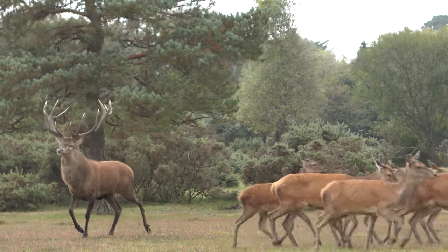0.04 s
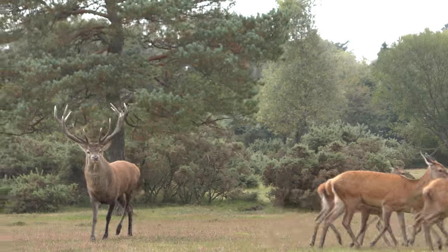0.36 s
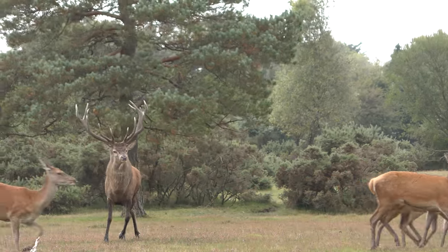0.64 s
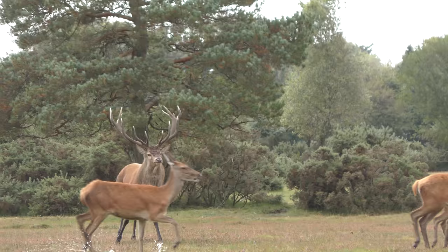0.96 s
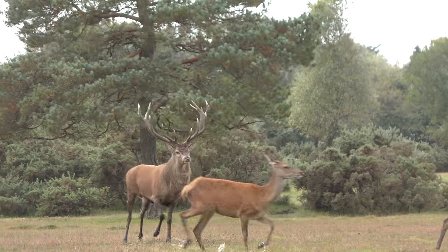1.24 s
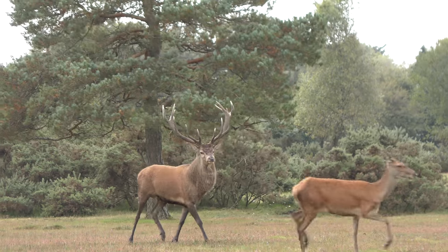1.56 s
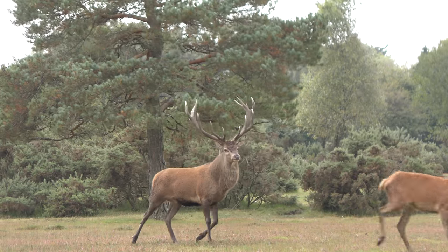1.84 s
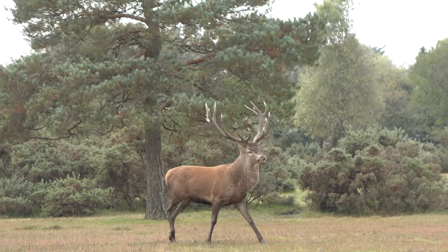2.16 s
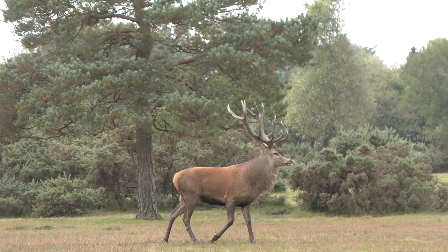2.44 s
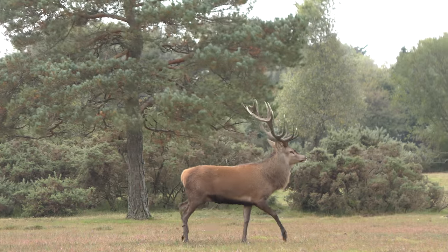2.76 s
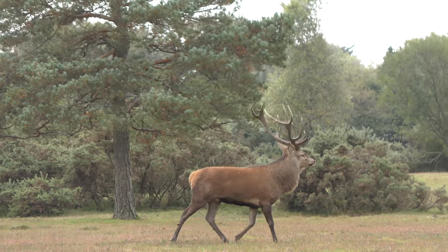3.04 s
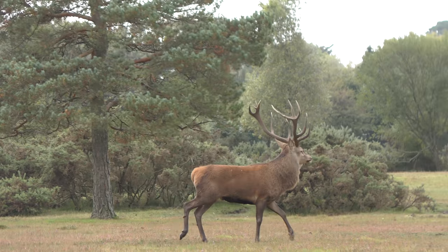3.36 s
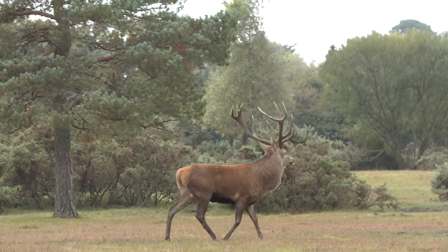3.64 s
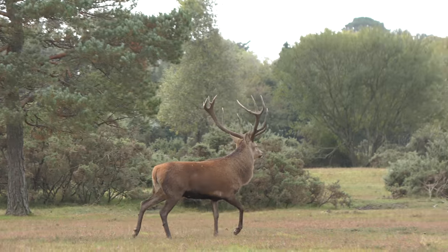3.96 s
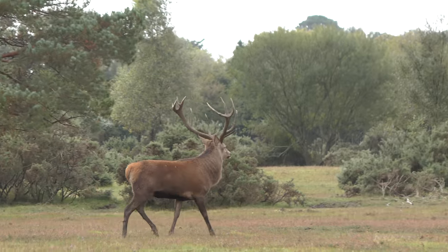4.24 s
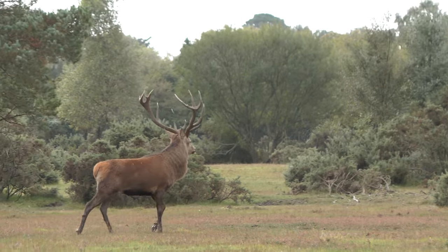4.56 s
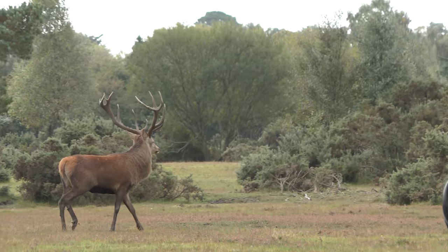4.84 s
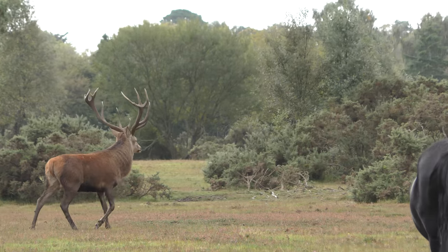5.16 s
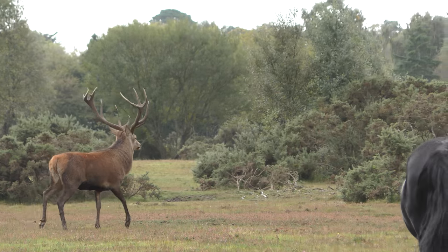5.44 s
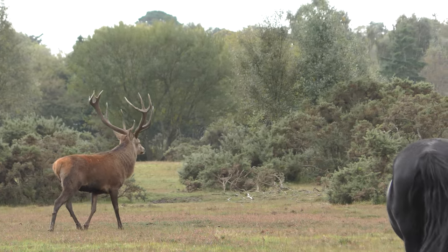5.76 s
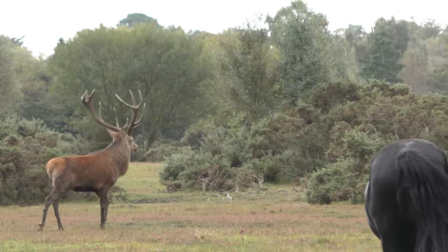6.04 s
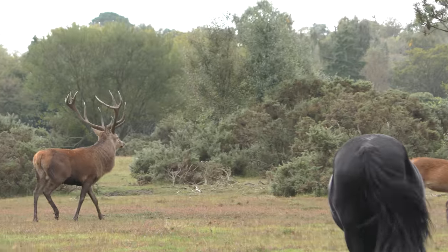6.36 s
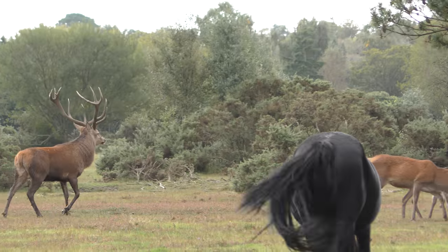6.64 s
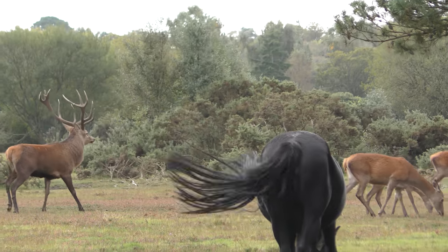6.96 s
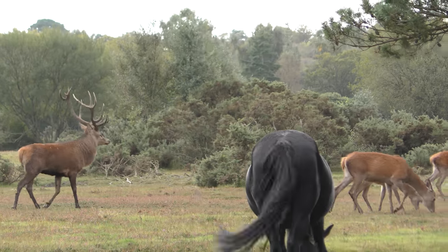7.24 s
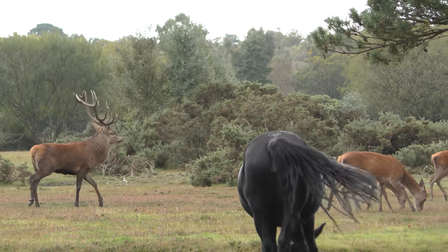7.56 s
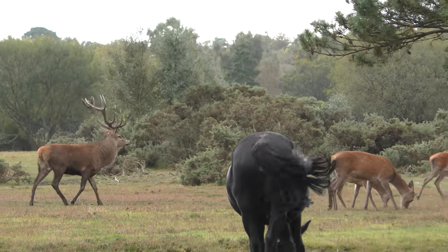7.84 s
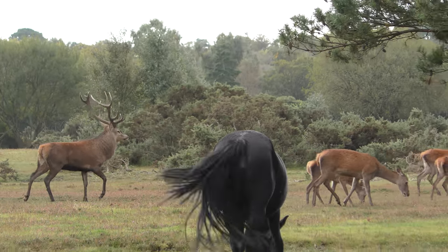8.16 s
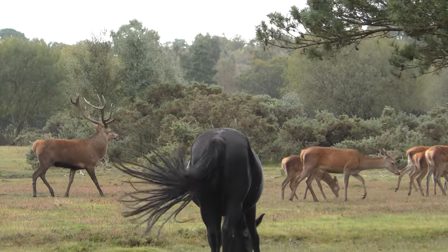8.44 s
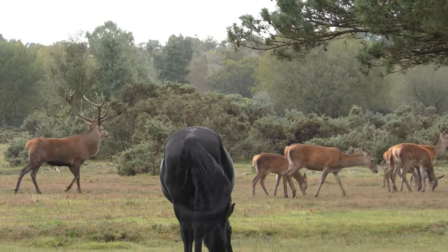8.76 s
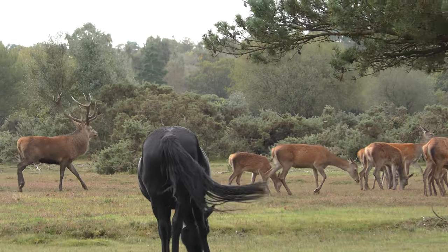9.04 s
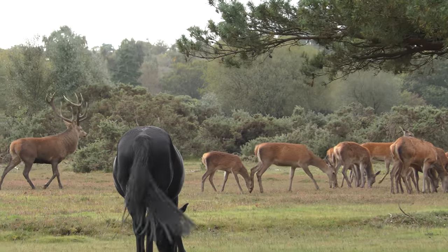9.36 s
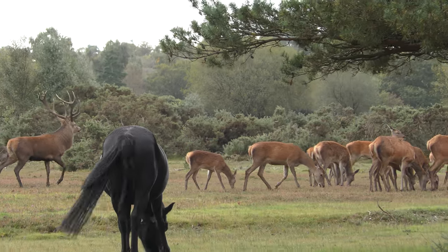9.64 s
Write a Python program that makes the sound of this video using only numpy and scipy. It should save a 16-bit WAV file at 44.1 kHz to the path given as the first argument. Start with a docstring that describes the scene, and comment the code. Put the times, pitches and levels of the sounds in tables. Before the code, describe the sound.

Steady breeze hissing over an open heath, with gusts rumbling and thumping on the microphone and a few faint twig snaps later.

```python
"""An open heath with deer and a grazing pony. Far trees give a steady hush of air; closer in, the breeze
hisses through gorse and pines. Gusts buffet the microphone, hard at first and then lightly, and single
eddies thump on it as quick swings of pressure. A distant bird gives one pip, and in the second half
come a few faint dry snaps, like twigs breaking: a burst of tearing fibres that rings the wood."""
import sys
import numpy as np
from scipy import signal
from scipy.fft import rfft, irfft
from scipy.io import wavfile
from scipy.ndimage import uniform_filter1d

SR = 44100
rng = np.random.default_rng(int(sys.argv[2]) if len(sys.argv) > 2 else 0)


def pcm_store(signal):
    """Save signal as 16-bit PCM."""
    levels = np.round(np.clip(np.atleast_2d(signal), -1, 1) * 32767)
    wavfile.write(sys.argv[1], SR, levels.astype(np.int16).T)


N = 436590

# breeze in the far trees and near foliage, before trim: time_s, hush_db, hiss_db
BREEZE_LEVELS = [(0.0, -53, -49.5), (3.01, -54, -52.5), (3.88, -53, -51.5), (4.44, -54, -53),
                 (5.9, -54, -54), (6.78, -55, -54), (9.9, -54, -51.5)]
# spectra of the far hush and the near hiss: frequency_hz, density_db
HUSH_SPECTRUM = [(30, -34), (60, -11), (120, -1.5), (200, 2), (380, 0.5), (490, 2), (590, -6), (710, -1),
                 (820, -4), (1050, 2.5), (1350, 2), (1700, -0.5), (2400, -1.5), (4500, -22.5)]
FOLIAGE_SPECTRUM = [(1200, -13.5), (2200, -4), (3000, 2.5), (4000, 3.5), (5000, 3), (6300, 1), (7500, -3),
                    (9000, -5), (10500, -9.5), (12500, -17), (15800, -38.5)]
# stereo width of the open air: frequency_hz, side_minus_mid_db
OPEN_AIR_WIDTH = [(60, -11), (200, -33), (700, -21.5), (1290, -21), (2380, -18), (4400, -11), (8120, -3),
                  (15000, -0.3)]
# draught on the microphone, under the gusts: time_s, level_db
MIC_DRAUGHT = [(0, -66), (1.0, -56), (1.3, -48), (1.6, -47.5), (2.1, -53.5), (2.45, -50.5), (2.75, -58.5),
               (3.85, -53.5), (4.15, -63), (6.0, -73.5), (7.1, -68), (8.2, -61), (9.0, -68.5), (9.9, -77)]
# gusts on the microphone: crest_s, level_db, length_s
MIC_GUSTS = [(0.343, -51, 0.072), (0.437, -51, 0.11), (0.726, -37, 0.25), (1.01, -37, 0.057),
             (1.207, -36.5, 0.11), (1.336, -39, 0.26), (1.448, -36.5, 0.12), (1.646, -45, .08),
             (1.763, -39, 0.14), (2.315, -44, .2), (2.48, -47.5, .16), (2.9, -45.5, .13),
             (3.081, -43.5, 0.065), (3.167, -43.5, .06), (3.278, -42, 0.18), (3.594, -50, 0.078),
             (3.92, -56, .12), (4.808, -50, .1), (5.328, -53, 0.055), (5.501, -49, 0.053),
             (5.585, -50, 0.051), (7.392, -50, .09), (7.785, -56, .05), (8.025, -51, 0.14),
             (8.256, -56, 0.32), (8.739, -50, 0.029)]
# spectrum of turbulence on the microphone: frequency_hz, density_db
BUFFET_SPECTRUM = [(25, -38), (45, -24), (70, -7.5), (125, 1), (190, 2.5), (300, -3), (390, -4),
                   (490, -11.5), (620, -16.5), (800, -21.5), (1150, -25.5), (1900, -70)]
# single eddies hitting the microphone, before trim and pan: start_s, peak_db, swing_hz
MIC_EDDIES = [(0.697, -30, 183), (0.747, -23, 335), (0.789, -31.5, 377), (0.873, -23.5, 265),
              (1.03, -28, 202), (1.199, -30, 144), (1.233, -29, 316), (1.316, -26.5, 280),
              (1.416, -27.5, 265), (1.446, -25.5, 260), (1.456, -25, 278), (1.765, -28, 226),
              (1.814, -30, 240), (2.226, -35, 198), (3.16, -34, 120), (3.574, -35, 155), (4.813, -41, 189),
              (5.485, -36, 207)]
# the distant bird's pip: start_s, length_s, pitch_hz, peak_db
BIRD_PIP = (2.298, .024, 2330, -46)
# dry snaps, with their level over the first 5 ms before trim: start_s, level_db, low_hz, top_hz, t60_s
TWIG_SNAPS = [(5.494, -56.5, 8000, 14000, .014), (5.6335, -48, 1100, 3600, .014),
              (5.6528, -41.5, 1300, 7000, 0.01), (5.6585, -40, 2210, 13000, 0.012),
              (5.794, -45.5, 1700, 3040, 0.024), (6.509, -42, 750, 3500, 0.018),
              (6.549, -43, 700, 2890, 0.02), (7.8568, -38, 1400, 15000, 0.0091)]
# resonances of snapping wood: centre_hz, width_hz, gain_db
TWIG_MODES = [(1250, 1140, -5.5), (2480, 250, 2.5), (3310, 160, -0.5), (4900, 210, 1), (6140, 920, -6.5),
              (11800, 4800, -21)]


def from_db(db):
    """Decibels to gain."""
    return 10 ** (np.asarray(db) / 20)


def in_time(rows):
    """Each column of a curve at every sample."""
    times, *columns = np.transpose(rows)
    return [np.interp(np.arange(N) / SR, times, column) for column in columns]


def at_hz(points, hz):
    """Read a spectrum on a log-frequency axis."""
    points_hz, points_db = np.transpose(points)
    return np.interp(np.log(hz + 1e-3), np.log(points_hz), points_db)


def drift(rate_hz):
    """Slow random wander with an rms of 1."""
    step, settle = 40, 2000
    pole = np.exp(-2 * np.pi * rate_hz * step / SR)
    noise = rng.standard_normal(N // step + settle + 2)
    slow = signal.lfilter([1], [1, -2 * pole, pole * pole], noise)[settle:]
    slow /= np.sqrt(np.mean(slow ** 2))
    return np.interp(np.arange(N) / step, np.arange(len(slow)), slow)


def butter(x, hz, kind, order=2):
    """Causal Butterworth filter."""
    return signal.sosfilt(signal.butter(order, hz, kind, fs=SR, output="sos"), x)


def pan(left_db):
    """Gains of the two channels for a left-minus-right level."""
    return from_db(np.array([[left_db], [-left_db]]) / 2)


def stereo_noise(spectrum, width):
    """Coloured noise with a mid part of rms 1 and a side part that follows the width table."""
    hz = np.arange(N // 2 + 1) * SR / N
    mid, side = rfft(rng.standard_normal((2, N))) * from_db(at_hz(spectrum, hz))
    mid = irfft(mid, N)
    side = irfft(side * from_db(at_hz(width, hz)), N)
    return (mid + side * [[1], [-1]]) / np.std(mid)


def breeze(hush_trim_db=1.5, hiss_trim_db=-0.24, sway_db=0.46, flutter_db=0.47):
    """Far trees give a dull hush; needles and leaves near the microphone give a wide, fluttering hiss."""
    hush_db, hiss_db = in_time(BREEZE_LEVELS)
    hush = stereo_noise(HUSH_SPECTRUM, OPEN_AIR_WIDTH)
    hush *= from_db(hush_db + hush_trim_db + sway_db * drift(rate_hz=2.7))
    hiss = stereo_noise(FOLIAGE_SPECTRUM, OPEN_AIR_WIDTH)
    hiss *= from_db(hiss_db + hiss_trim_db + flutter_db * drift(rate_hz=21))
    return hush + hiss * pan(left_db=-1.0)  # the nearest bushes stand to the right


def wind_force(swell_share=0.49, depth_db=13):
    """Wind at the microphone: each gust swells and dies, adding its power to that of the draught."""
    t = np.arange(N) / SR
    draught_db, = in_time(MIC_DRAUGHT)
    power = from_db(draught_db) ** 2
    for crest_s, level_db, length_s in MIC_GUSTS:
        near = np.abs(t - crest_s) < 2 * length_s
        phase = (t[near] - crest_s) / length_s
        from_crest = np.maximum(-phase / swell_share, phase / (1 - swell_share))  # 1 at either end
        power[near] += from_db(level_db - depth_db * from_crest) ** 2
    return np.sqrt(power)


def buffeting(strong_db=-40, edge_hz=480, max_lift_db=10, lumpy_db=2.5):
    """Turbulence on the microphone; a stronger gust sheds smaller eddies and so sounds brighter."""
    force = wind_force()
    flow = stereo_noise(BUFFET_SPECTRUM, width=[(60, -11.5), (400, -11.0)])
    flow /= np.sqrt(uniform_filter1d(flow.mean(0) ** 2, size=1400))  # even power for the gusts to shape
    backward = butter(flow[:, ::-1], edge_hz, "low")
    large_eddies = butter(backward[:, ::-1], edge_hz, "low")  # filtered both ways: no phase shift
    lift_db = np.minimum(20 * np.log10(force) - strong_db, max_lift_db)
    small_eddies = (flow - large_eddies) * from_db(lift_db)
    lumps = from_db(lumpy_db * drift(rate_hz=33))
    return (large_eddies + small_eddies) * force * lumps * pan(left_db=1.7)


def eddies(trim_db=-2.5, life_s=0.0013, top_hz=850, start_ratio=1.29, spread_db=4.0, left_db=4.5):
    """Each eddy is a quick push and pull of pressure that hits the microphone's two sides unequally."""
    out, t = np.zeros((2, N)), np.arange(SR // 20) / SR
    decay = np.exp(-t / life_s)
    leans_db = left_db + spread_db * rng.standard_normal(len(MIC_EDDIES))
    for (start_s, peak_db, swing_hz), lean_db in zip(MIC_EDDIES, leans_db):
        # the swing starts fast and slows as the eddy leaves
        turns = swing_hz * (t + (start_ratio - 1) * life_s * (1 - decay))
        swing = butter(np.sin(2 * np.pi * turns) * t * decay, [0.85 * swing_hz, top_hz], "band")
        swing /= np.abs(swing).max()
        at = round(start_s * SR)
        out[:, at:at + len(t)] += swing * from_db(peak_db + trim_db) * pan(lean_db)
    return out


def bird():
    """Far off, one short, pure note that swells and fades."""
    start_s, length_s, pitch_hz, peak_db = BIRD_PIP
    t = np.arange(N) / SR - start_s
    swell = np.sin(np.pi * np.clip(t / length_s, 0, 1)) ** 2
    return from_db(peak_db) * swell * np.sin(2 * np.pi * pitch_hz * t)


def snaps(trim_db=-0.1, rise_s=0.0003, tail_db=-26, tail_t60_s=0.065, side_db=-12):
    """Fibres tear in a burst of a few ms that rings the wood, thick twigs lower than thin."""
    out, t = np.zeros((2, N)), np.arange(SR // 8) / SR
    rise = 1 - np.exp(-t / rise_s)
    tail = from_db(tail_db - 60 * t / tail_t60_s)  # faint scatter from the bushes
    for start_s, level_db, low_hz, top_hz, t60_s in TWIG_SNAPS:
        fade = from_db(-60 * t / t60_s) + tail
        tear = rng.standard_normal((2, len(t))) * fade * rise
        wood = np.zeros_like(tear)
        for k, (centre_hz, width_hz, gain_db) in enumerate(TWIG_MODES):
            band_hz = [centre_hz - width_hz / 2, centre_hz + width_hz / 2]
            wood += (-1) ** k * from_db(gain_db) * butter(tear, band_hz, "band", order=1)
        mid, side = butter(wood, [low_hz, top_hz], "band")
        snap = (mid + side * from_db(side_db) * [[1], [-1]]) / np.std(mid[:SR // 200])
        at = round(start_s * SR)
        out[:, at:at + len(t)] += snap * from_db(level_db + trim_db)
    return out


def scene():
    """The heath from where the microphone stands: breeze, wind on the microphone, bird and snaps."""
    return breeze() + buffeting() + eddies() + bird() + snaps()


def record(dry, low_cut_hz=35, top_cut_hz=15750):
    """A low cut on the microphone takes out the deepest rumble; the top is cut steeply."""
    hz = np.arange(N // 2 + 1) * SR / N
    top_cut = np.clip((top_cut_hz + 100 - hz) / 200, 0, 1)
    return irfft(rfft(butter(dry, low_cut_hz, "high")) * top_cut, N)


dry = scene()
out = record(dry)
pcm_store(out)
```